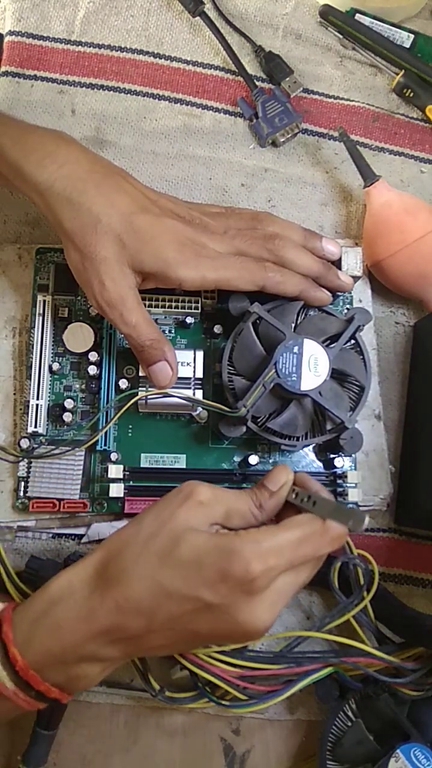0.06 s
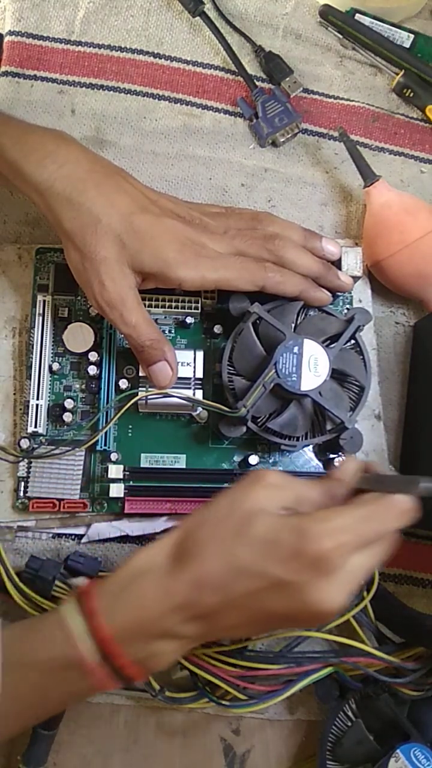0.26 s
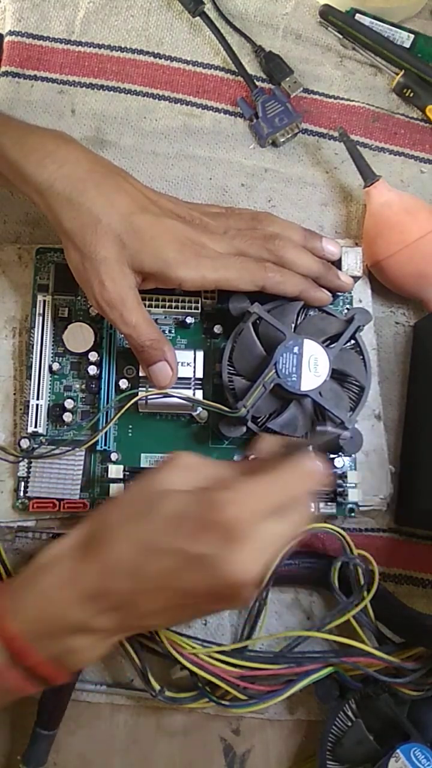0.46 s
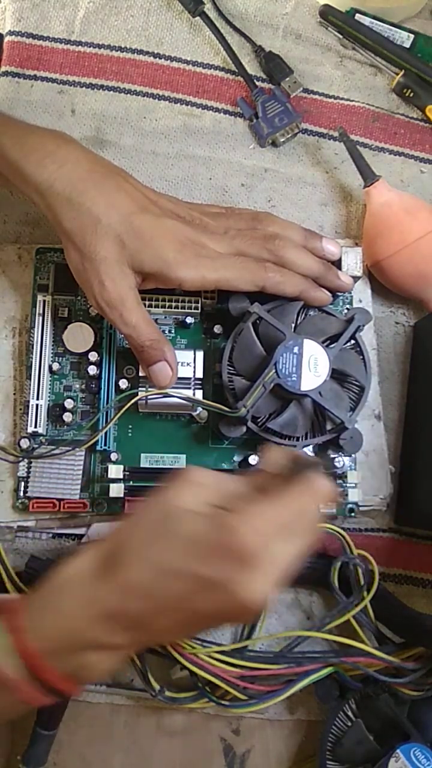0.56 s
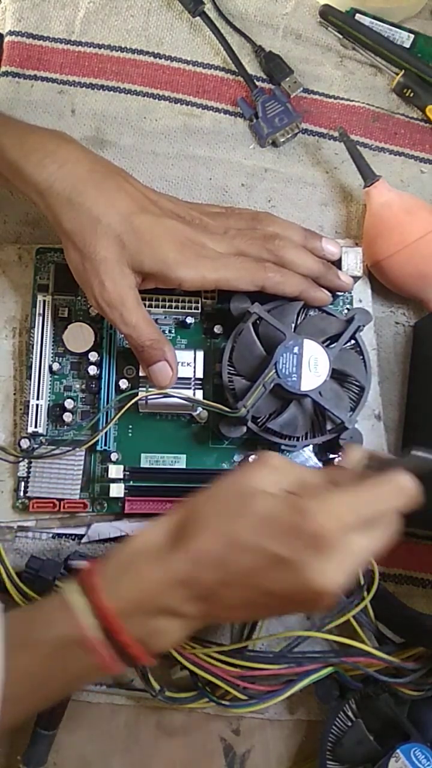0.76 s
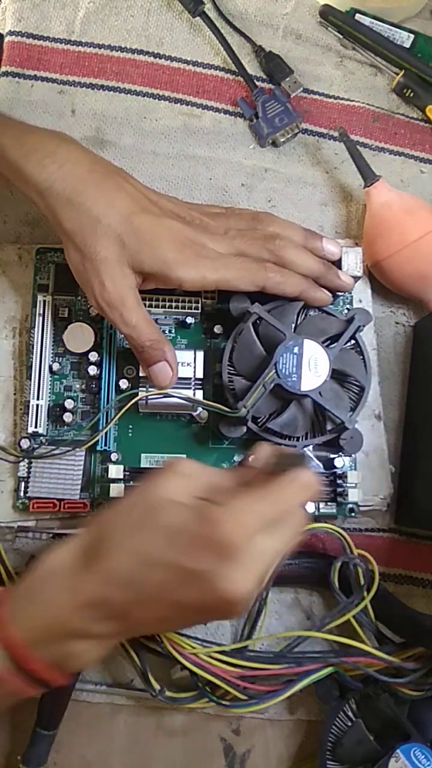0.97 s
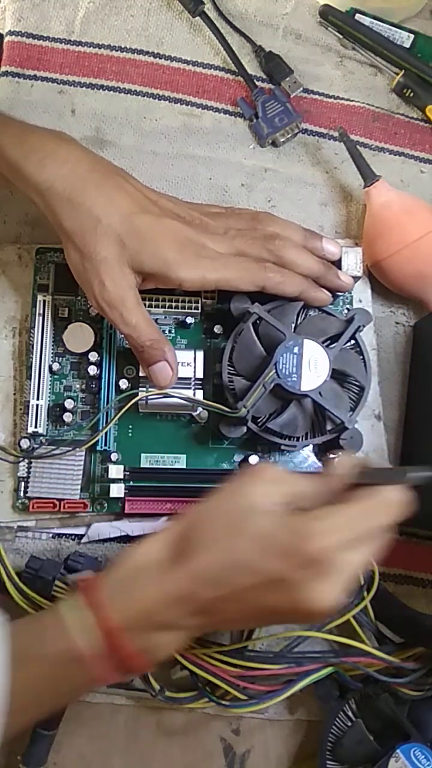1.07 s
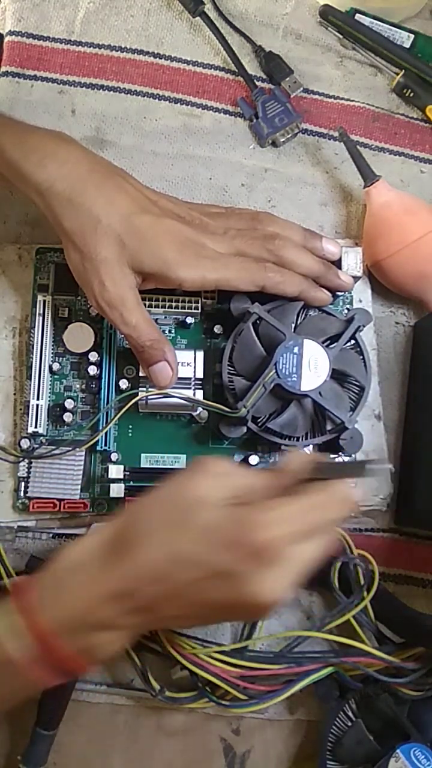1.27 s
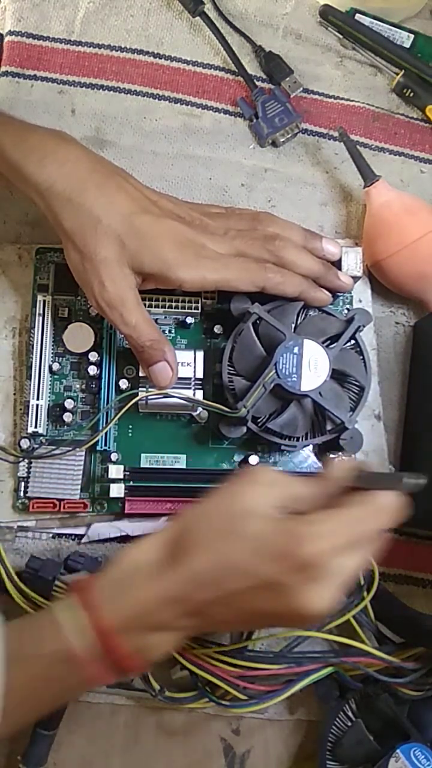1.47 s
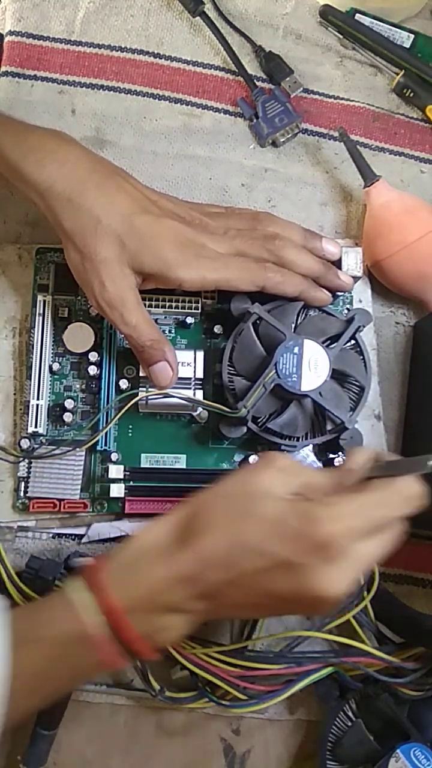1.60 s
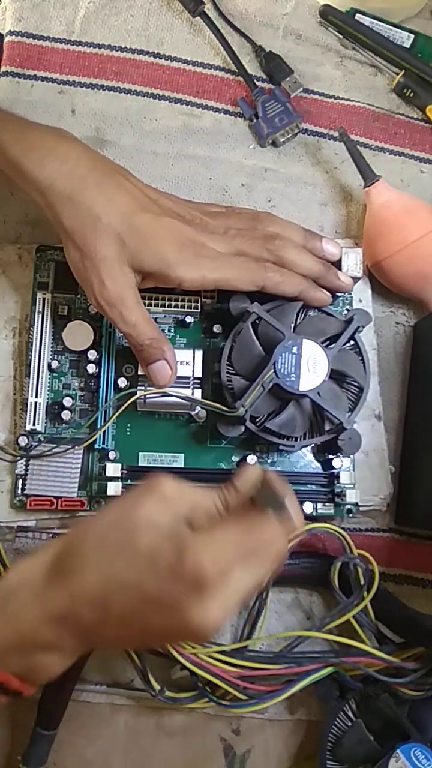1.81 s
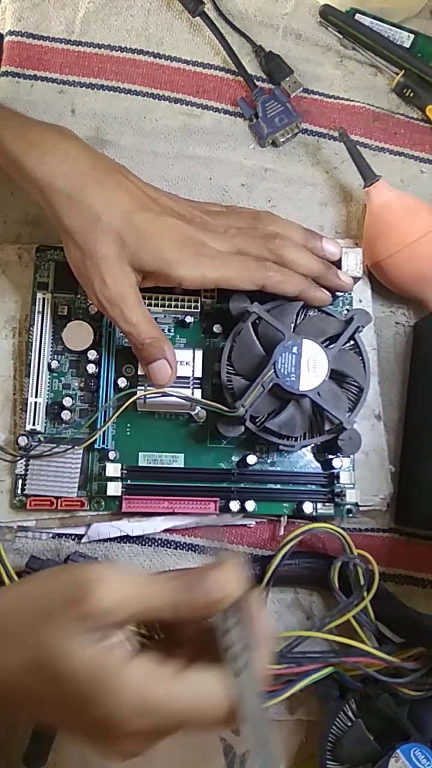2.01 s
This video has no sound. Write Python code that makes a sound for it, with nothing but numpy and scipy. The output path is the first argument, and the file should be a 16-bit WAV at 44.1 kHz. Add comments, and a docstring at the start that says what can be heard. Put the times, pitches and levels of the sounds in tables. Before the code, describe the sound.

Quick, raspy scraping of a metal tool along a circuit board slot, with light ticks.

```python
"""A small metal tool scrubs back and forth in a plastic slot of a circuit board, on a bench in a small room.
Each of eight strokes is a stream of tiny slips that rasps in the slot and rings the board and bench.
The tool ticks on edges, judders as it sticks and slips, and knocks at the end of its travel.
Hands shift the board with dull rubs, and the tool clinks once before the first stroke, over low room tone."""
import sys
import numpy as np
from scipy import signal
from scipy.fft import rfft, irfft
from scipy.io import wavfile

SR = 44100
rng = np.random.default_rng(int(sys.argv[2]) if len(sys.argv) > 2 else 0)


def generate_wav(sig):
    """Save sig (samples, or channels by samples) to the path in sys.argv[1] as 16-bit PCM at SR."""
    pcm = np.round(np.clip(np.atleast_2d(sig).T, -1, 1) * 32767).astype(np.int16)
    wavfile.write(sys.argv[1], SR, pcm)


N = 90404
T = np.arange(N) / SR


def from_db(db):
    """Decibels to gain."""
    return 10 ** (np.asarray(db) / 20)


def unit_rms(x):
    """Scale to rms 1."""
    return x / np.sqrt(np.mean(x ** 2) + 1e-20)


def unit_energy(x):
    """Scale each channel to energy 1."""
    return x / np.sqrt(np.sum(x ** 2, axis=-1, keepdims=True) + 1e-20)


def through(x, response):
    """Play x through an impulse response."""
    return signal.fftconvolve(np.atleast_2d(x), np.atleast_2d(response), axes=-1)[:, :N]


def colour(x, hz, db):
    """Smooth EQ curve that keeps the power of white noise."""
    f = np.maximum(np.fft.rfftfreq(2 * N, 1 / SR), 1)
    curve = unit_rms(from_db(np.interp(np.log(f), np.log(hz), db)))
    return irfft(rfft(x, 2 * N) * curve)[..., :N]


def delayed(x, seconds):
    """Steady or moving delay line."""
    return np.interp(T - seconds, T, x, left=0)


def stereo(mid, side):
    """Left and right from mid and side."""
    return mid + side * np.array([[1], [-1]])


def pan(db):
    """Channel gains that put the left db above the right."""
    return from_db([[db / 2], [-db / 2]])


def drift(hz):
    """Random modulator, rms 1, rolling off above hz."""
    pole = np.exp(-2 * np.pi * hz / SR)
    smooth = signal.sosfilt([1, 0, 0, 1, -2 * pole, pole * pole], rng.standard_normal(N + SR))
    return unit_rms(smooth[SR:])


def ringing(modes, signs=1):
    """Impulse response of damped modes, each given as f/Hz, width/Hz, level/dB."""
    hz, width, db = np.transpose(modes)[:, :, None]
    t = T[:SR // 4]
    partials = signs * from_db(db) * width * np.exp(-np.pi * width * t) * np.sin(2 * np.pi * hz * t)
    low_cut = signal.butter(2, hz.min() / 2, "high", fs=SR, output="sos")
    return unit_energy(signal.sosfilt(low_cut, partials.sum(axis=0)))


def tail(t60_s):
    """Dense stereo decay of unit energy."""
    return unit_energy(rng.standard_normal((2, N)) * from_db(-60 * T / t60_s))


def contact(start, length, *levels_db, attack_s=.003, release_s=.0088):
    """Envelope: the tool bites, presses through the given levels and lets go."""
    bite = np.clip((T - start) / attack_s, 0, 1)
    let_go = np.exp(-np.maximum(T - start - length, 0) / release_s)
    times = np.linspace(start, start + length, len(levels_db))
    return bite * let_go * from_db(np.interp(T, times, levels_db))


def slips(per_s=3500, spread_db=3.5):
    """Friction grain: tiny random slips of uneven size, rms 1."""
    sizes = from_db(spread_db * np.minimum(rng.exponential(1, N), 4)) * rng.choice([-1, 1], N)
    return unit_rms(sizes * (rng.random(N) < per_s / SR))


# EQ curve of the room tone: f/Hz, relative level/dB
ROOM_TONE_EQ = [(20, 9), (60, 2), (90, 0), (125, 7.5), (165, -14), (400, -10.5), (700, -19), (1500, -24.5),
                (3000, -37.5), (16000, -46)]


def room_tone():
    """A low, steady bed of noise, narrow and a little to the left."""
    mid, side = from_db(-63.5) * colour(rng.standard_normal((2, N)), *np.transpose(ROOM_TONE_EQ))
    return pan(2.5) * stereo(mid, from_db(-13) * side)


# rubs of the board on the bench: centre t/s, half length/s, f/Hz, level/dB
RUBS = [(0.06, 0.0066, 397, -60.5), (0.147, 0.0085, 380, -70), (0.193, 0.025, 690, -70.5),
        (0.337, 0.021, 378, -62), (0.607, 0.017, 1320, -62), (0.745, .018, 400, -48),
        (1.085, .03, 290, -51), (1.16, .02, 240, -48), (1.51, .02, 250, -48), (1.052, 0.018, 1130, -50),
        (1.471, 0.029, 1260, -47), (1.848, 0.047, 1350, -64), (2.033, 0.0075, 500, -65.5)]


def hand_rubs(relative_width=.25):
    """The board shifts under the hands: soft swells of slips through one broad resonance each."""
    out = 0
    for centre, half, hz, db in RUBS:
        swell = from_db(db) * np.exp(-((T - centre) / half) ** 2)
        out = out + through(slips() * swell, ringing([(hz, relative_width * hz, 0)]))
    return out


def tool_clink(at_s=.131, hz=10800, width_hz=100):
    """One light touch rings the metal tool."""
    touch = from_db(-47) * (np.arange(N) == int(at_s * SR))
    return through(touch, ringing([(hz, width_hz, 0)]))


# strokes of the tool: t/s, length/s, rasp level/dB (start, middle, end),
# board level/dB (start, middle, end), bench level/dB
STROKES = [ (0.219, 0.022, -39, -26, -26.5, -36.5, -26, -29.5, -51),
           (0.424, 0.12, -46, -41, -39, -66.5, -41.5, -38.5, -71),
           (0.625, 0.14, -33, -26, -23.5, -37.5, -34.5, -35, -57.5),
           (0.855, 0.1, -24.5, -24, -47.5, -42, -33, -47, -60.5),
           (1.049, 0.12, -26.5, -22.5, -30.5, -28, -32.5, -44, -49),
           (1.26, 0.12, -46.5, -36, -34.5, -56.5, -44, -37.5, -64.5),
           (1.456, 0.1, -28.5, -21.5, -30.5, -31, -31.5, -49.5, -53.5),
           (1.681, 0.1, -30.5, -35, -36, -39, -44, -40, -61.5)]
# EQ curve of the slot: f/Hz, relative left level/dB, relative right level/dB
SLOT_EQ = [(500, -33, -19.5), (1556, -5, -5.5), (2470, -5, -0.5), (2870, -2, -5), (4120, -12.5, -10),
           (5360, -3.5, -5), (6830, -4.5, -1), (7300, -1.5, -2.5), (8100, -15, 1.5), (9200, -4.5, 0.5),
           (10000, -4, 1.5), (11320, 6.5, 11.5), (12220, -5, 3), (13000, 9, 11.5), (15550, 0.5, -14.5),
           (15440, 5, 9.5), (18500, -14.5, -21.5)]


def slot_rasp(grip, centre_share=.27, shelf_hz=8500, shelf_db=(-7.5, -6)):
    """Slips and ticks ring briefly in the plastic slot; the colour sweeps as the tool travels."""
    grains = np.sqrt(centre_share) * slips() + np.sqrt(1 - centre_share) * np.array([slips(), slips()])
    force = grains * grip * sum(contact(*stroke[:2], *stroke[2:5]) for stroke in STROKES)
    stroke_ends = [t for start, length, *_ in STROKES for t in (start, start + length)]
    # the treble shelf opens a little along each stroke
    shelf = from_db(np.interp(T, stroke_ends, np.resize(shelf_db, len(stroke_ends))))
    treble = signal.sosfiltfilt(signal.butter(2, shelf_hz, "high", fs=SR, output="sos"), force)
    force = force + (shelf - 1) * treble + edge_ticks()
    # flanging: the echo off the slot's end shortens on one stroke and lengthens on the next
    there_and_back_s = [.000904, .0007236, .0007236, .000904]
    echo_s = np.interp(T, stroke_ends, np.resize(there_and_back_s, len(stroke_ends)))
    force = force + from_db(-5) * np.array([delayed(channel, echo_s) for channel in force])
    ring_gain = from_db(-1.5)
    rung = (force + ring_gain * through(force, tail(t60_s=.028))) / np.hypot(1, ring_gain)
    hz, *curves_db = np.transpose(SLOT_EQ)
    left, right = [colour(channel, hz, db) for channel, db in zip(rung, curves_db)]
    return pan(-1.2) * np.array([left, delayed(right, 4 / SR)])


# modes of the circuit board: f/Hz, width/Hz, relative level/dB
BOARD_MODES = [(499.3, 8.9, -14), (533.5, 12.3, -1.5), (631.5, 21, 0), (846.6, 26, 8.5), (988, 42.3, 7),
               (1120, 28, 7.5), (1269, 66, 3.5), (1400, 69, 2.5), (1494, 30, 6.5), (1595, 61, 3.5),
               (1762, 110, -3), (1951, 79, -0.5), (2412, 96, -13.5), (2730, 67, -10)]


def board_ring(grip, scoop_hz=782, scoop_width_hz=470):
    """The body of the sound: slips, judder and knocks drive the board's modes."""
    polarity = (-1) ** np.arange(len(BOARD_MODES))[:, None]
    scoop = signal.iirnotch(scoop_hz, scoop_hz / scoop_width_hz, fs=SR)
    board = signal.lfilter(*scoop, ringing(BOARD_MODES, polarity))
    pressure = grip * sum(contact(*stroke[:2], *stroke[5:8]) for stroke in STROKES)
    mid = through(slips() * pressure, board) + judder(board) + end_knocks(board)
    side = from_db(-12.5) * through(slips() * pressure, board)
    return stereo(mid, side)


# modes of the workbench: f/Hz, width/Hz, relative level/dB
BENCH_MODES = [(516, 50, 25), (770, 53, 17), (860, 60, -4.5)]


def bench_shake():
    """The weight of the strokes shakes the bench under the board."""
    weight = sum(contact(start, length, bench_db) for start, length, *_, bench_db in STROKES)
    return through(slips() * weight, ringing(BENCH_MODES))


# ticks of the tool on edges: t/s, level/dB
EDGE_TICKS = [(0.222, -21), (0.243, -16), (0.429, -42), (0.458, -25.5), (0.649, -19.5), (0.856, -26.5),
              (1.056, -23), (1.267, -39), (1.359, -20), (1.692, -17.5)]


def edge_ticks(decay_s=.0011):
    """The tool catches an edge: a sharp spit of noise that excites the slot."""
    bursts = sum(from_db(db) * (T >= at) * np.exp(-np.abs(T - at) / decay_s) for at, db in EDGE_TICKS)
    return bursts * rng.standard_normal((2, N))


# runs of stick-slip: t/s, length/s, first rate/Hz, last rate/Hz, level/dB
JUDDER_RUNS = [(0.467, 0.066, 546.7, 487, -52), (0.638, 0.085, 495.5, 590.6, -48),
               (0.892, 0.020, 1020, 852, -38), (0.898, 0.033, 700, 613.5, -41.5),
               (1.054, 0.12, 560, 500, -45), (1.297, 0.054, 510, 612.4, -49), (1.685, 0.098, 630, 562, -44)]


def judder(board, jitter=.045, band_hz=(350, 700), spread_db=2):
    """Soft, nearly regular slips buzz the board; their rate glides with the speed of the tool."""
    wobble = 1 + jitter * drift(hz=120)
    soften = signal.butter(2, band_hz, "band", fs=SR, output="sos")
    out = 0
    for start, length, first_hz, last_hz, db in JUDDER_RUNS:
        rate_hz = np.interp(T, [start, start + length], [first_hz, last_hz]) * wobble
        slip_count = np.floor(np.cumsum(rate_hz) / SR)
        pulses = np.diff(slip_count, prepend=0) * from_db(spread_db * rng.standard_normal(N))
        buzz = through(signal.sosfilt(soften, pulses) * contact(start, length, 0), board)
        out = out + from_db(db) * np.sqrt(length * SR) * unit_energy(buzz)
    return out


# hits against the end of the slot: t/s, level/dB
END_KNOCKS = [(0.479, -19), (0.544, -17), (0.643, -12), (0.899, -8.5), (0.951, -8), (1.37, -21),
              (1.376, -14.5), (1.475, -24), (1.512, -16), (1.771, -21.5), (1.782, -12.5)]


def end_knocks(board, hz=1313, width_hz=380):
    """The tool hits the end of its travel: a short hollow knock that also rings the board."""
    hits = np.zeros(N)
    for at, db in END_KNOCKS:
        hits[int(at * SR)] = from_db(db)
    hollow = ringing([(hz, width_hz, 0)])
    edge = ringing([(hz, 2 * width_hz, 0)])
    knock = unit_energy(through(edge, hollow))
    return through(hits, knock) + from_db(-9) * through(hits, board)


def room_reverb(send):
    """Small room: quick nearby reflections and a fainter, longer tail."""
    return through(send, from_db(-11.5) * tail(t60_s=.21) + from_db(-12) * tail(t60_s=.33))


def scene():
    """Rasp and body feed the room; rubs, clink and room tone stay dry."""
    grip = unit_rms(from_db(1.5 * drift(hz=98)))  # uneven pressure of the tool
    rasp = slot_rasp(grip)
    body = pan(.1) * (board_ring(grip) + bench_shake())
    wet_mid, wet_side = from_db(-2.5) * room_reverb(body.mean(axis=0))
    reverb = room_reverb(rasp) + stereo(wet_mid, from_db(-.5) * wet_side)
    return room_tone() + hand_rubs() + tool_clink() + rasp + body + reverb


def record(dry):
    """Steep high cut at 15.9 kHz on the whole mix."""
    return signal.sosfilt(signal.ellip(12, .1, 80, 15900, fs=SR, output="sos"), dry)


dry = scene()
out = record(dry)
generate_wav(out)
```